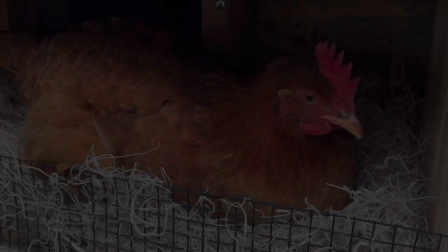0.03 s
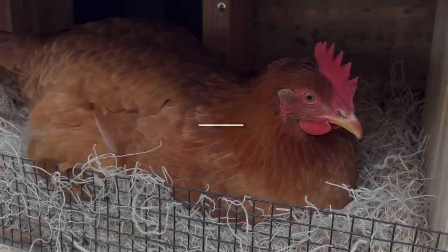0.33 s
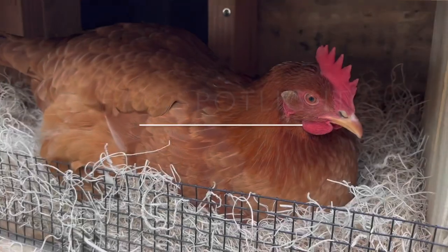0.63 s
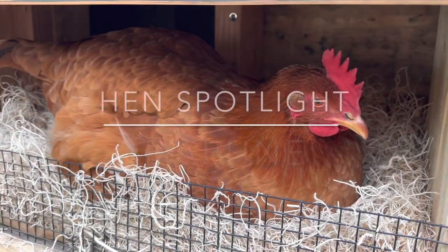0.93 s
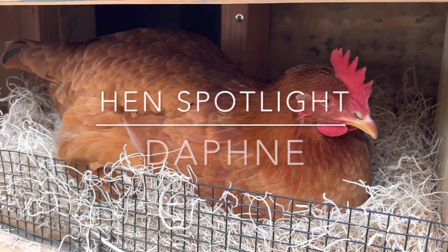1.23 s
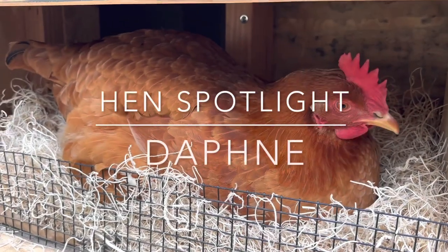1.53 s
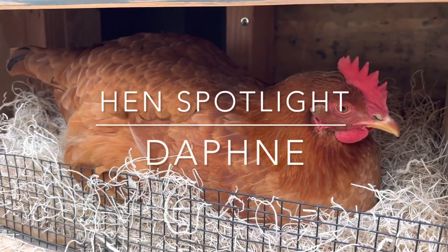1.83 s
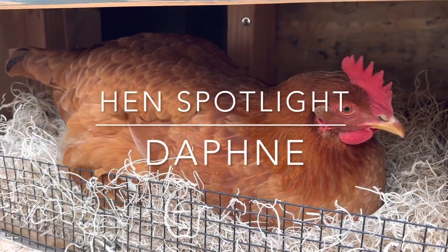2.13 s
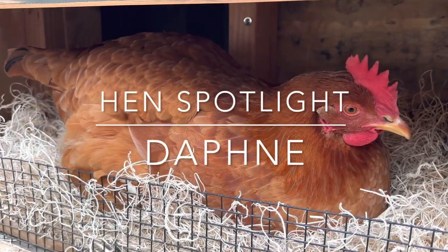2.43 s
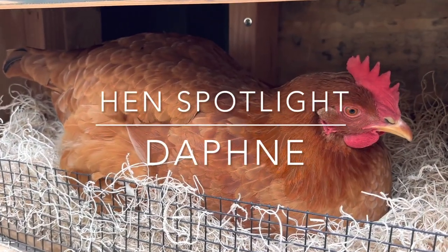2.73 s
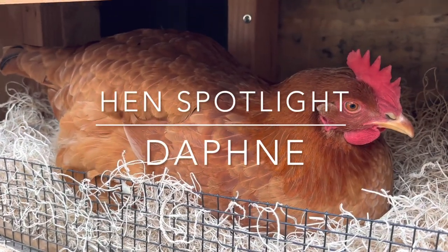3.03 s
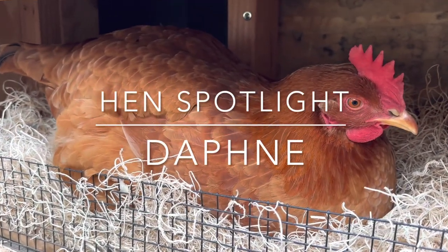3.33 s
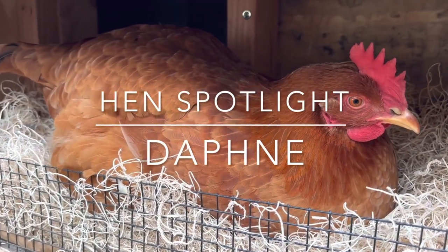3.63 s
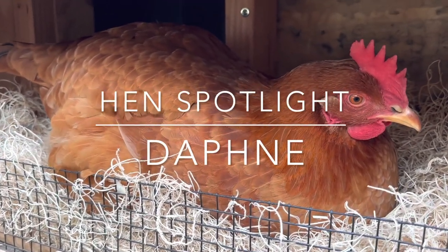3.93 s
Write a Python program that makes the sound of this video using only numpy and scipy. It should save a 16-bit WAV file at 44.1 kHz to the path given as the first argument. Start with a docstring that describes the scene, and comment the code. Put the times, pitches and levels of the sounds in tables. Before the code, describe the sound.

A hen in a straw nest box holds a thin, wavering whine that breaks into a rough growl, swells and stops. Faint straw snaps, small wooden knocks and a low electrical hum sound close by in a quiet coop.

```python
"""In a quiet coop, a hen on a straw nest holds a thin, wavering whine that breaks into a rough growl.
The growl is a run of uneven pulses from her voice box ringing her throat; it swells until she stops.
Straw snaps and slides under her, the wooden nest box knocks faintly and the floor bumps softly.
A low electrical hum drones over still air. The sound fades in at the start."""
import sys
import numpy as np
from scipy import signal
from scipy.fft import rfft, irfft, next_fast_len
from scipy.io import wavfile
from scipy.ndimage import uniform_filter1d, map_coordinates

SR = 44100
rng = np.random.default_rng(int(sys.argv[2]) if len(sys.argv) > 2 else 0)


def wav_out(sig):
    """Save sig, one row per channel (or a flat mono array), as 16-bit PCM at SR to the path in sys.argv[1]."""
    wavfile.write(sys.argv[1], SR, np.round(np.clip(np.atleast_2d(sig).T, -1, 1) * 32767).astype(np.int16))


N = 176400
BREAK_S, BREAK_LENGTH_S, STOP_S = .806, .03, 2.39  # the whine turns into the growl; the voice ends
SIZZLE_HZ = 4180  # the top of the rasp starts here

# the note of the whine: (time [s], pitch [Hz])
WHINE_PITCH = [(.06, 575), (.09, 525), (.165, 537.5), (.19, 569.5), (.222, 490), (.252, 594), (.277, 590),
               (.29, 517), (.355, 519.5), (.372, 553), (.392, 517), (.425, 502), (.455, 531.7),
               (.49, 502.4), (.578, 519.5), (.61, 490.7), (.663, 508), (.737, 483.6), (.782, 521),
               (.805, 452)]
# how hard the hen pushes, in whine and growl: (time [s], level [dB])
EFFORT = [(.03, -44.5), (.35, -42), (.43, -43), (.745, -41), (.83, -43), (.9, -41), (1.28, -39),
          (1.46, -38.5), (1.62, -37.5), (1.79, -37.5), (1.96, -37), (2.322, -36.5), (2.348, -40.5),
          (2.385, -61)]
# higher tones in the whine: (multiple of the pitch [ratio], level before the throat [dB])
OVERTONES = [(2, -12), (3, -8)]
# breathy noise in the whine: (time [s], level against the tone [dB])
HOARSENESS = [(.1, -32.5), (.68, -26.5), (.74, -8), (.77, -22), (.8, -20)]
def whine():
    """A nearly pure tone whose overtones slide through the throat's resonances; it ends hoarse."""
    t = clock()
    pitch = curve(WHINE_PITCH, t) * (1 + .013 * wobble(160))
    phase = 2 * np.pi * np.cumsum(pitch) / SR
    overtones = coloured(sum(amp(db) * np.sin(round(k) * phase) for k, db in OVERTONES), THROAT)
    # a faint whistle at seven times the pitch, where that meets a peak of the rasp
    seventh = coloured(np.sin(7 * phase + .8 * wobble(200)), RASP)
    whistle = amp(-50) * np.minimum(t / BREAK_S, 1) ** 1.5 * seventh
    flutter = amp(2.8 * wobble(100))
    tone = np.sqrt(2) * (np.sin(phase) + (overtones + whistle) * flutter)
    breath = rng.standard_normal(N) + 1.2 * wobble(130) * np.sin(2 * phase)
    hoarse = amp(curve(HOARSENESS, t)) * unit(coloured(breath, THROAT))
    hiss_gain = amp(-45 + 1.6 * wobble(36))
    puffs = rng.standard_normal(N) * (1 + np.sin(phase))  # one puff of air each cycle
    hiss = filtered(hiss_gain * unit(coloured(puffs, RASP)), lambda hz: 1 - above(hz, SIZZLE_HZ))
    level_db = curve(EFFORT, t) + .0056 * (pitch - 500) + 1.3 * wobble(45)  # higher notes are louder
    return amp(level_db) * (tone + hoarse + hiss) * np.sqrt(1 - growl_share(t))


# how fast the voice box pulses in the growl: (time [s], rate [Hz])
GROWL_RATE = [(.79, 467.3), (.825, 430), (1.15, 422.2), (1.28, 470.6), (1.47, 423), (1.54, 488.3),
              (1.71, 426), (1.75, 478), (1.79, 392.6), (1.96, 496.3), (2.01, 435.6), (2.11, 421.4),
              (2.19, 472.7), (2.29, 404.4), (2.36, 537.4)]
def voice_box(wander=.045, jitter=.18, chaos_rise_s=.064):
    """The voice box slips into uneven pulses: one set for the throat, a rougher one for the rasp."""
    t = clock()
    gap_scatter, size_scatter, rasp_scatter = np.clip(rng.standard_normal((1000, 3)), -2.2, 2.2).T
    start = BREAK_S - BREAK_LENGTH_S
    rate = curve(GROWL_RATE, t) * np.exp(wander * growl_share(t) * wobble(60))
    cycles = np.cumsum(rate * (t > start)) / SR
    regular = np.interp(np.arange(len(gap_scatter)), cycles, t).clip(start)
    chaos = 1 - np.exp(-(regular - start) / chaos_rise_s)
    times = regular + np.cumsum(jitter * chaos * gap_scatter / curve(GROWL_RATE, regular))
    sizes = amp(2 * chaos * size_scatter)
    return pulses(times, sizes), pulses(times, sizes * amp(3 * rasp_scatter))


# how the throat rings, in growl and whine: (frequency [Hz], gain [dB])
THROAT = [(90, -52.5), (150, -24), (190, -2), (290, 0), (430, -3.5), (530, -2.5), (615, 4.5), (680, -6.5),
          (722, -13.5), (800, -4), (900, -10.5), (1010, -22), (1080, -17), (1300, -16), (1420, -20),
          (1500, -31), (1550, -19), (1670, -22.5), (2100, -42), (2730, -75.5), (4600, -120)]
# the high ringing that makes the voice raspy: (frequency [Hz], gain [dB])
RASP = [(1500, -28), (1900, -7.5), (2130, -6.5), (2390, 3), (3050, -7.5), (3350, -3), (3570, 4), (3930, -9),
        (4130, -3), (4480, -12.5), (4750, -2.5), (5100, -11.5), (5390, -9), (6300, -31), (7120, -18),
        (7600, -32.5), (8400, -16), (9050, -21.5), (9370, -1.5), (9800, -31), (11500, -46), (14300, -20.5)]
def growl(rasp_db=-28.5, bite_db_per_s=1.2, sizzle_db_per_s=9.5, bright_hz=910):
    """Uneven pulses ring the throat; their sharp edges and puffs of air add a dry rasp."""
    t = clock()
    beats, edges = voice_box()
    body = evened(coloured(beats, THROAT))  # steady air pressure evens out the growl
    puffs = uniform_filter1d(edges, size=66) * rng.standard_normal(N)
    rasp = evened(coloured(unit(edges) + amp(-6) * unit(puffs), RASP))
    effort_db = curve(EFFORT, t)
    push = amp(effort_db - effort_db.max())
    # pushing harder makes the voice brighter
    upper = filtered(body, lambda hz: above(hz, bright_hz, order=8))
    body = body - upper + amp(3) * upper * push ** 1.42
    # the rasp builds towards the end, its top fastest
    left_s = np.maximum(STOP_S - t, 0)
    sizzle = filtered(rasp, lambda hz: above(hz, SIZZLE_HZ, order=8))
    rasp = rasp - sizzle + sizzle * amp(-sizzle_db_per_s * left_s)
    voice = push * body + amp(rasp_db - bite_db_per_s * left_s) * rasp * push ** 2
    ending = np.clip((STOP_S - t) / BREAK_LENGTH_S + .5, 0, 1)
    return amp(effort_db.max()) * voice * np.sqrt(growl_share(t)) * ending


def growl_share(t):
    """0 while the hen whines, 1 once she growls."""
    return np.clip((t - BREAK_S) / BREAK_LENGTH_S + .5, 0, 1)


# which side hears her louder: (frequency [Hz], left minus right [dB])
HEN_BALANCE = [(150, 0.5), (330, -2), (640, -4.5), (740, -8), (900, -3.5), (1100, -12), (1400, -6.5),
               (1790, -4), (2400, 0)]
# which side hears her first, negative for the right: (frequency [Hz], left phase lead [rad])
HEN_PHASE = [(0, -0.5), (600, -1.17), (1210, -1.43), (1700, -4), (2240, -5.5)]
def hen():
    """Her voice reaches the right side a little louder and earlier, and rings the nest box."""
    def sides(hz):
        gain = amp(along(HEN_BALANCE, hz) / 2)
        return np.array([gain * np.exp(1j * curve(HEN_PHASE, hz)), 1 / gain])
    return box_ring(filtered(whine() + growl(), sides), ring_db=-17.5)


def box_ring(x, ring_db, ring_s=.17, dull_hz=4500):
    """Adds the short, dull ring of the nest box, which falls 60 dB in ring_s."""
    t = np.arange(SR // 4) / SR
    tail = rng.standard_normal((2, len(t))) * amp(-60 * t / ring_s)
    ring = signal.fftconvolve(np.atleast_2d(x), tail / np.linalg.norm(tail[0]), axes=1)[:, :N]
    return x + amp(ring_db) * filtered(ring, lambda hz: 1 - above(hz, dull_hz, order=2))


# straw stalks snapping: (time [s], level [dB])
SNAPS = [(0.516, -63.5), (.6445, -57), (.722, -56.5), (0.7455, -58), (.864, -52.5), (1.017, -53.5),
         (1.102, -53.5), (1.3586, -46), (2.579, -49.5), (3.0769, -46.5)]
# the bright tone of a snap: (frequency [Hz], gain [dB])
SNAP_COLOUR = [(500, 3), (2200, 2), (2950, 9), (4100, -1), (6300, 1), (7600, -15.5), (11500, -19),
               (15000, -4.5)]
def straw_snaps(thud_hz=278, thud_s=.057, thud_db=-3.5):
    """Each stalk snaps with a tick, and the nest floor answers with one dull, short note."""
    thuds = np.zeros(N)
    for at, db in SNAPS:
        age = np.clip(clock() - at, 0, None)
        decay_db = 60 * np.minimum(age / thud_s, 2)
        thuds += amp(db + thud_db - decay_db) * np.sin(2 * np.pi * thud_hz * age)
    return clicks(SNAPS, SNAP_COLOUR, scrape=.32, scrape_s=.00069) + thuds


# small knocks on the box: (time [s], level [dB])
KNOCKS = [(.2375, -49), (.686, -54.5), (.864, -58), (1.3345, -42), (2.5795, -61.5), (3.078, -60),
          (3.657, -62.5)]
# the tone of the wood: (frequency [Hz], gain [dB])
WOOD_COLOUR = [(150, -3.5), (900, 8), (2000, 5), (3000, -11), (4500, -28.5), (15000, -43.5)]
def box_knocks():
    """The wooden box knocks, duller than the straw and with a longer scrape."""
    return clicks(KNOCKS, WOOD_COLOUR, scrape=.077, scrape_s=.0082)


def clicks(rows, colour, scrape, scrape_s):
    """Each contact is one sharp click with a brief scrape after it, ringing in the box."""
    t = clock()
    times, levels_db = np.transpose(rows)
    tails = sum(amp(db) * (t > at) * np.exp(-np.abs(t - at) / scrape_s) for at, db in rows)
    contacts = pulses(times, amp(levels_db)) + scrape * tails * rng.standard_normal(N)
    peak = np.abs(coloured(pulses([1], [1]), colour)).max()
    return box_ring(coloured(contacts, colour) / peak, ring_db=-3)


# straw sliding: (peak time [s], half length [s], level [dB], low edge [Hz], high edge [Hz])
RUSTLES = [(.918, .004, -76.5, 8900, 12160), (0.94, 0.0046, -80, 9100, 12200),
           (1.29, .006, -75.5, 7533, 16000), (1.343, .023, -68, 2960, 17360),
           (3.094, 0.016, -85, 1500, 4600), (3.95, 0.061, -77, 700, 1810)]
# the tone of sliding straw: (frequency [Hz], gain [dB])
STRAW_COLOUR = [(1000, 3.5), (4000, 9.5), (7000, -1), (9800, -2), (11500, -19), (14500, -2.5)]
def straw_rustles():
    """Straw slides on straw and feathers, making a crowd of tiny crackles."""
    crackle = coloured(rng.standard_normal(N) * amp(2.6 * wobble(1300)), STRAW_COLOUR)
    def band(low, high):
        return unit(filtered(crackle, lambda hz: above(hz, low) * (1 - above(hz, high, order=8))))
    return sum(amp(db) * swell(at, half) * band(low, high) for at, half, db, low, high in RUSTLES)


# soft bumps in the floor: (peak time [s], half length [s], level [dB])
BUMPS = [(1.338, 0.025, -49), (2.027, 0.011, -46), (3.08, 0.026, -55), (3.72, 0.063, -57.5)]
# the deep tone of a bump: (frequency [Hz], gain [dB])
BUMP_COLOUR = [(28, -38.5), (45, -3.5), (120, -9), (800, -78.5)]
def floor_bumps():
    """Each bump in the floor is a brief swell of low rumble."""
    swells = sum(amp(db) * swell(at, half) for at, half, db in BUMPS)
    return swells * unit(coloured(rng.standard_normal(N), BUMP_COLOUR))


def electrical_hum(pitch_hz=119.65):
    """A low, wavering note with a faint overtone at three times its pitch."""
    phase = 2 * np.pi * pitch_hz * clock()
    note = amp(-49 + wobble(22)) * np.sin(phase + .1 * wobble(15))
    return np.sqrt(2) * (note + amp(-80) * np.sin(3 * phase))


# the dull tone of still air: (frequency [Hz], gain [dB])
AIR_COLOUR = [(20, -34.5), (40, -4.5), (100, 4.5), (250, -12), (900, -24), (1500, -31.5), (2500, -45.5),
              (4500, -50.5), (7000, -46.5), (11500, -58), (14500, -51.5)]
# how alike the air sounds on both sides: (frequency [Hz], likeness [0 to 1])
AIR_LIKENESS = [(40, 0.72), (150, 0.43), (1000, 0.13)]
def still_air(level_db=-57):
    """Quiet noise whose low notes are more alike left and right than its high ones."""
    def shares(hz):
        angle = np.arccos(np.clip(along(AIR_LIKENESS, hz), 0, 1)) / 2
        return np.array([np.cos(angle), np.sin(angle)])
    mid, side = filtered(unit(coloured(rng.standard_normal((2, N)), AIR_COLOUR)), shares)
    return amp(level_db) * np.array([mid + side, mid - side])


def amp(db):
    """Turns decibels into a number to multiply by."""
    return 10 ** (np.asarray(db) / 20)


def unit(x):
    """x scaled to an average strength of 1."""
    return x / np.sqrt(np.mean(x ** 2) + 1e-20)


def evened(x, window_s=.02):
    """x held at a steady strength of 1, keeping its fast roughness."""
    power = np.abs(uniform_filter1d(unit(x) ** 2, size=int(window_s * SR) + 1))
    return unit(x) / np.sqrt(power + 1e-3)


def clock():
    """The time of every sample, in seconds."""
    return np.arange(N) / SR


def swell(peak_s, half_s):
    """A bell-shaped rise and fall."""
    return np.exp(-((clock() - peak_s) / half_s) ** 2 / 2)


def curve(rows, x):
    """(x, value) rows joined by straight lines."""
    return np.interp(x, *np.transpose(rows))


def along(rows, hz):
    """(frequency, value) rows joined on a log axis, like notes on a keyboard."""
    knots, values = np.transpose(rows)
    return np.interp(np.log(hz + 1), np.log(knots + 1), values)


def wobble(rate):
    """A smooth random curve through rate points a second."""
    return map_coordinates(rng.standard_normal(4 * N // 100), [clock() * rate], mode="wrap")


def filtered(x, response):
    """x with each frequency scaled and shifted by response(hz)."""
    size = 2 * next_fast_len(N * 3 // 4)
    return irfft(rfft(x, size) * response(np.fft.rfftfreq(size, 1 / SR)), size)[..., :N]


def coloured(x, colour):
    """x shaped by (frequency, gain) rows; the filter rings after a sound, never before it."""
    def response(hz):
        cepstrum = irfft(np.log(amp(along(colour, hz))))
        middle = len(cepstrum) // 2
        cepstrum[1:middle] *= 2
        cepstrum[middle + 1:] = 0
        return np.exp(rfft(cepstrum))
    return filtered(x, response)


def above(hz, edge_hz, order=4):
    """A smooth gain that lets through what lies above edge_hz."""
    return hz ** order / (hz ** order + edge_hz ** order)


def pulses(times, sizes):
    """Sharp clicks at exact times, even between samples."""
    at = np.asarray(times)[:, None] * SR
    near = at.astype(int) + np.arange(-7, 9)
    shape = np.sinc(near - at) * np.cos(np.pi * (near - at) / 16) ** 2
    return np.bincount(np.clip(near, 0, N - 1).ravel(), (shape * np.asarray(sizes)[:, None]).ravel(), N)


def scene():
    """The hen, her nest and the quiet coop around her."""
    nest = straw_snaps() + box_knocks()
    lean_left = amp([[.5], [-.5]])
    return hen() + nest + straw_rustles() + floor_bumps() + lean_left * (electrical_hum() + still_air())


def record(dry, silent_s=.036, fade_s=.8, top_hz=15900):
    """Fades in from silence and cuts off the very highest treble."""
    t = clock()
    fade = (t > silent_s) * np.minimum(t / fade_s, 1) ** 1.205
    return filtered(dry * fade, lambda hz: hz < top_hz)


dry = scene()
out = record(dry)
wav_out(out)
```